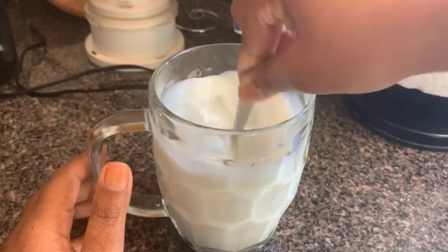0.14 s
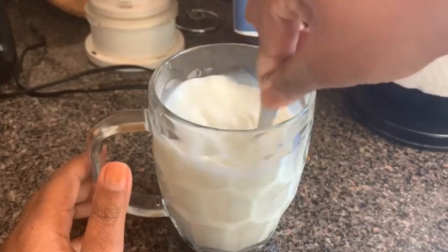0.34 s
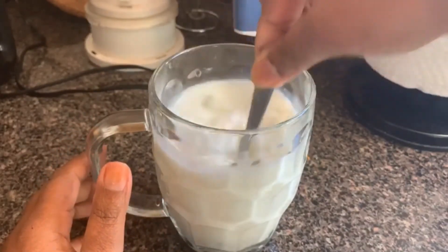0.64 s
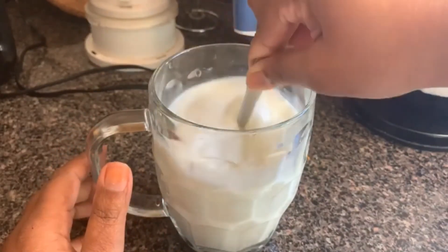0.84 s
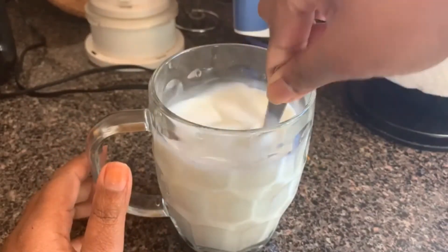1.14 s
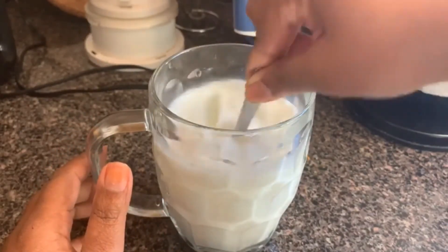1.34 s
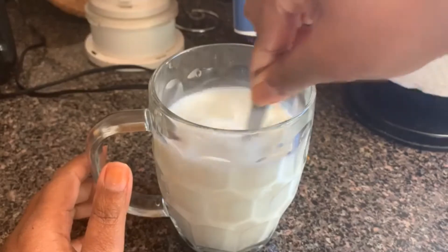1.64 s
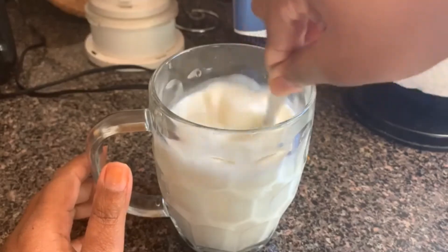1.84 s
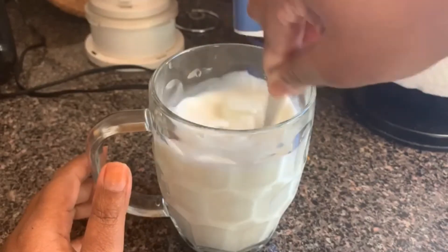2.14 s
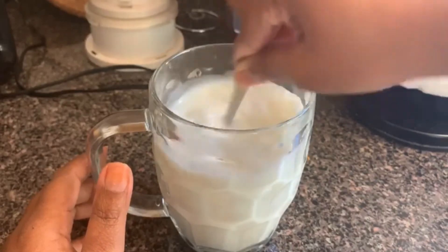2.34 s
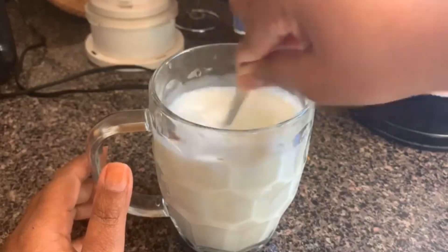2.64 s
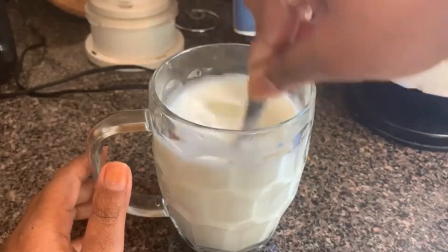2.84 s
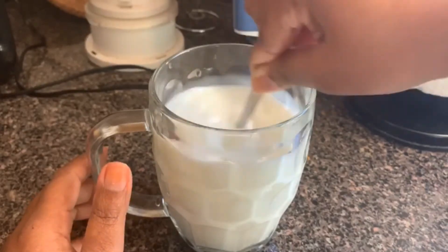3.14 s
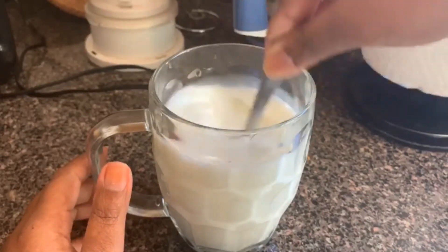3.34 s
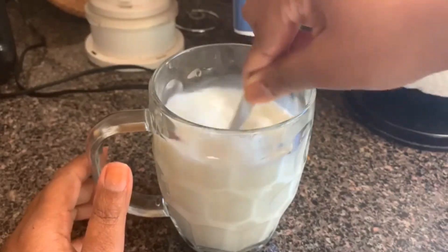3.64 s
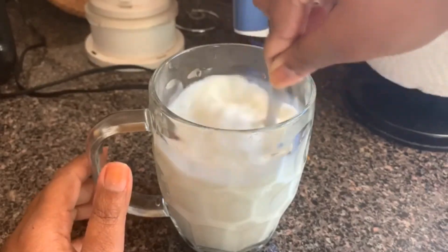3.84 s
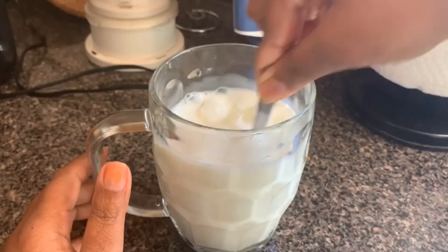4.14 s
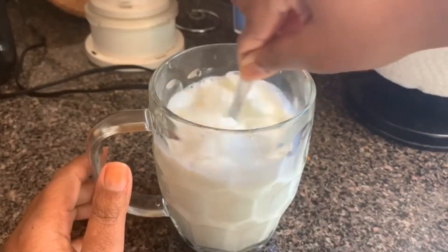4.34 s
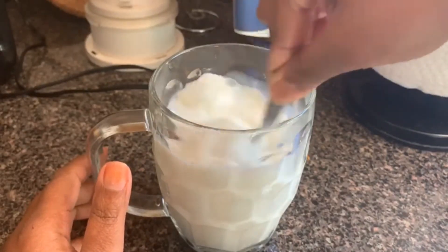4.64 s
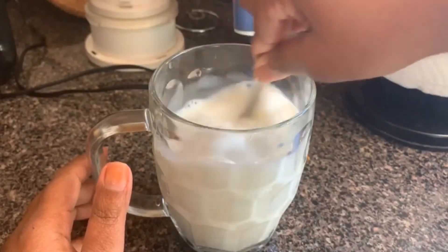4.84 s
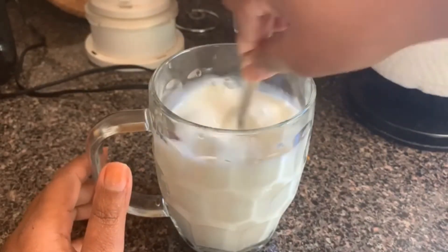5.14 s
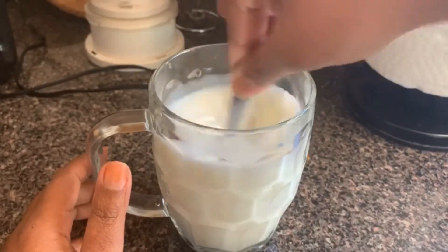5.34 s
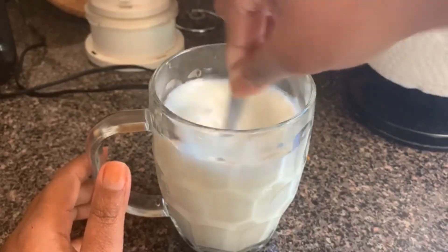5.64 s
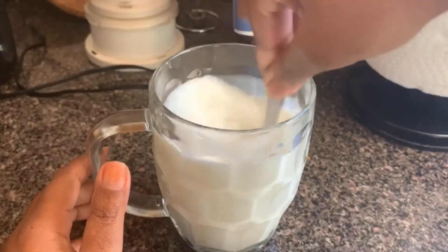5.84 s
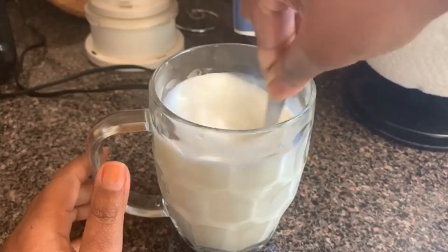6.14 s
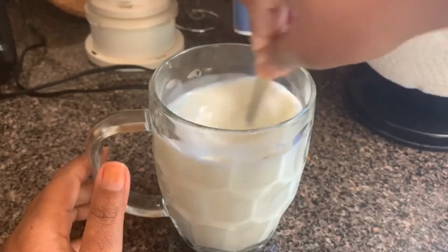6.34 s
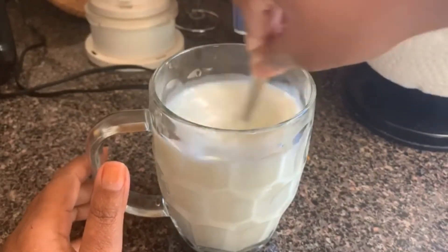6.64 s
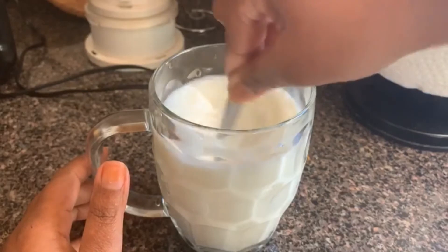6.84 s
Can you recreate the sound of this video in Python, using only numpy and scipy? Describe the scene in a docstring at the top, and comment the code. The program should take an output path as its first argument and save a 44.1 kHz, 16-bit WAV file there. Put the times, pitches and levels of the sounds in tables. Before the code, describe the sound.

Quick, uneven clinks run from start to finish as a steel spoon circles in a glass mug of milk. The liquid keeps each tap short, and sugar grates lightly along the wall under a faint gurgle. Now and then the mug knocks softly on the stone counter. The stirring is heard up close in a kitchen, over a steady refrigerator hum and low room noise.

```python
"""Stirring a glass mug

A steel spoon stirs milk and sugar in a thick glass mug on a stone counter, near a two-port microphone.
Each blow excites modes of glass and steel; the milk damps the glass, so the clinks are short.
Between clinks the spoon grinds sugar along the wall and bubbles ring in the milk.
The kitchen reverberates briefly, and a refrigerator hums behind, over faint room noise."""
import sys
import numpy as np
from scipy import signal
from scipy.fft import rfft, irfft
from scipy.io import wavfile
from scipy.ndimage import uniform_filter1d

SR = 44100
rng = np.random.default_rng(int(sys.argv[2]) if len(sys.argv) > 2 else 0)


def transcribe(signal):
    """Save signal, clipped to [-1, 1], as a 16-bit WAV file at the path in sys.argv[1]."""
    frames = np.atleast_2d(signal).T
    limited = np.clip(frames, -1, 1)
    pcm = np.round(limited * 32767).astype(np.int16)
    wavfile.write(sys.argv[1], SR, pcm)


N = 307818

# Modes of the milk-damped wall: pitch_ratio, level_db, t60_s
WALL_MODES = [(1.026, 9.5, 0.018), (1.16, -6, 0.031), (0.854, -7, 0.022)]
# Phase lead of the left port over the right: frequency_hz, lead_rad
PORT_LEAD = [(500, -0.5), (1210, 1.3), (3400, 3), (5500, 4.5), (6550, 6.5), (7840, 2.5), (9400, 2.5),
             (10300, 1.27), (12200, -0.3)]
# Level of the left port over the right: frequency_hz, balance_db
PORT_BALANCE = [(250, -1.5), (600, 0), (1150, 5), (1500, 4), (2200, .7), (4500, -1.2), (9000, 0)]


def spoon():
    """Impact excitation: the spoon strikes the wall, and some blows rock the mug on the stone."""
    # Blows on the wall: start_s, level_db, pitch_hz, relative_glass_db, relative_steel_db
    blows = [(0.039, -25.5, 1383, -12.5, -23.5), (0.143, -28.5, 1326, -25, -38),
             (0.195, -27.5, 920, -29, -27), (0.261, -36, 1640, -15, -7.5), (0.309, -30, 1580, -27, -21),
             (0.392, -33, 1250, -9, -47), (0.504, -28.5, 1570, -11, -26), (0.596, -42, 1480, -1.5, -4),
             (0.736, -24, 1450, -29, -25), (0.759, -27, 1440, -11, -16.5), (0.799, -16.5, 1490, -22, -30),
             (0.86, -25, 1323, -7.5, -36), (0.92, -30, 1380, -15, -30), (0.986, -36.5, 1390, -6.5, -12),
             (1.081, -32.5, 1540, -28, -31), (1.139, -35, 1520, -8.5, -13.5), (1.208, -40, 1550, -9, -8.5),
             (1.326, -23.5, 1330, -12, -21), (1.353, -35, 1270, -12, -2.5),
             (1.442, -24.5, 1446, -15.5, -13.5), (1.541, -25.5, 1497, -39, -48),
             (1.677, -24, 1263, -19.5, -18), (1.768, -21, 1290, -17, -25.5), (1.862, -38, 1480, 4, 3),
             (1.899, -25.5, 1430, -31, -19.5), (1.924, -39.5, 1380, -7, -8), (1.98, -26.5, 1260, -31, -36),
             (1.995, -21, 1260, -28, -35), (2.005, -35.5, 1430, -8, -7), (2.047, -24.5, 1450, -13, -14.5),
             (2.095, -18, 1265, -18, -29.5), (2.18, -17, 1550, -17, -24.5), (2.241, -43, 1270, 5.5, -11),
             (2.322, -34, 1420, -24, -22), (2.438, -22, 1306, -17, -13), (2.492, -25, 1250, -6, -25),
             (2.572, -23.5, 1580, -7, -10), (2.754, -21, 1140, -15, -26), (2.877, -33.5, 1070, -2.5, -14),
             (2.896, -26, 1320, -8, -22), (2.924, -17.5, 1297, -9, -27), (2.954, -20.5, 1280, -43, -28),
             (3.004, -41, 1580, -29, -6), (3.11, -29, 1320, -41, -27), (3.198, -25.5, 1290, -20, -36),
             (3.345, -45.5, 1290, 1, -3.5), (3.406, -33.5, 1530, 5.5, -4), (3.414, -24, 1360, -24, -17),
             (3.431, -23, 1290, -7.5, -11.5), (3.524, -27, 1103, -15, -44), (3.585, -23.5, 1174, -10, -17),
             (3.623, -16.5, 1190, -11.5, -14), (3.641, -17, 1317, -44, -22), (3.712, -25.5, 1390, -19, -24),
             (3.766, -38, 1350, -2, 0), (3.887, -18, 1225, -16, -32.5), (3.939, -22, 1067, -46, -30.5),
             (4.042, -46.5, 1620, -28, 2.5), (4.205, -24, 1306, -7, -25.5), (4.291, -29, 1660, -16, -19),
             (4.322, -23, 1544, -14, -12.5), (4.377, -42.5, 1500, -25, 1.5), (4.523, -38, 1130, -6, -11),
             (4.55, -42, 1490, -1.5, -4), (4.626, -29, 1314, -9.5, -18), (4.74, -33.5, 1110, -9, -5.5),
             (4.886, -34.5, 1350, -5.5, -10), (4.928, -31.5, 1570, -10.5, -11),
             (4.994, -17.5, 1324, -16.5, -25), (5.19, -37.5, 1450, 1, 1.5), (5.277, -17, 1383, -16, -25.5),
             (5.378, -29, 1390, -5, -21), (5.488, -27, 1240, -9.5, -12.5), (5.569, -19, 1180, -13, -25.5),
             (5.658, -25, 1250, -16, -50), (5.728, -22.5, 1246, -16, -20.5), (5.842, -20, 1470, -19, -21.5),
             (5.869, -21, 1120, -14, -23), (5.917, -29, 1570, -8, -31), (5.982, -19, 1305, -17, -21),
             (6.126, -18.5, 1140, -16, -26), (6.163, -20.5, 1285, -11, -39),
             (6.25, -26.5, 1340, -4.5, -18.5), (6.314, -19, 1260, -20.5, -25), (6.364, -34, 1600, -3, -9),
             (6.392, -24.5, 1750, -4, -34), (6.406, -21.5, 1550, -7, -42), (6.435, -12.5, 1337, -12.5, -21),
             (6.618, -15, 1280, -10.5, -28.5), (6.711, -28, 1010, -7, -20.5),
             (6.753, -24.5, 1330, -38, -25), (6.833, -24, 1080, -23, -30), (6.864, -27.5, 1080, -9, -17),
             (6.898, -25.5, 1200, -5, -12.5)]
    # Crisp blows of the spoon's thin edge: start_s, relative_level_db
    edge_blows = [(0.23, -38), (0.272, -34), (0.6958, -40), (0.921, -40), (1.8632, -47), (1.9774, -42),
                  (2.0946, -32), (2.1796, -38), (2.345, -36), (2.3926, -36.5), (2.4905, -31), (2.5752, -17),
                  (2.7516, -35), (3.0054, -27.5), (3.198, -52), (3.477, -37.5), (3.6217, -34.5),
                  (3.886, -31.5), (4.108, -36.5), (4.376, -32), (4.455, -38.5), (4.739, -37), (4.904, -40),
                  (4.9918, -36.5), (5.106, -63), (5.1903, -22.5), (5.7262, -31), (5.8423, -35),
                  (5.8711, -36), (6.123, -34.5), (6.4332, -25.5), (6.8643, -32)]
    # Spectrum of an edge blow: frequency_hz, gain_db
    edge_spectrum = [(4500, -36.5), (7100, -2), (8800, -9), (11400, -7), (13500, -43)]
    # Blows that rock the mug: start_s, level_db
    knocks = [(0.043, -43), (1.774, -31), (2.188, -42), (5.278, -41.5), (5.85, -41.5), (6.318, -40.5),
              (6.434, -35.5), (6.618, -42)]
    # Modes of the mug on the counter: frequency_hz, level_db, t60_s
    counter_modes = [(140, 19.5, 0.029), (215, 13.5, 0.028), (305, 13, 0.051), (407, 11.5, 0.058),
                     (497, 12.5, 0.043)]
    mix = np.zeros((2, N))
    for start, db, *blow in blows:
        add(mix, start, amp(db) * clink(*blow))
    for start, db in edge_blows:
        _, steel = clack(0.0013, 0.013, spectrum=edge_spectrum, width=0.27)
        add(mix, start, amp(db + 16.5) * steel)
    for start, db in knocks:
        knock = ring(counter_modes, 0.0011, spread_db=2.0, detune=0.015, spread_rad=0.064)
        add(mix, start, amp(db) * knock)
    return mix


def clink(pitch_hz, glass_db, steel_db):
    """Superposition: one blow sounds a dull wall tone, a dense clack and a few clear modes."""
    # Clear modes of the mug and of the spoon: frequency_hz, level_db, t60_s
    glass_modes = [(1988, -6.5, 0.044), (2380, -6, 0.03), (3010, 3.5, 0.042), (3804, 7.5, 0.027)]
    steel_modes = [(4820, 14, 0.012), (6960, 9, 0.015), (7800, -2, 0.0089)]
    wall = ring(np.array(WALL_MODES) * [pitch_hz, 1, 1], 0.0014,
                spread_db=3.5, detune=0.036, spread_rad=0.78)
    glass = amp(16.5) * clack(0.0022, 0.035)[0]
    steel = amp(16.0) * clack(0.00077, 0.038)[1]
    glass += ring(glass_modes, 0.002, spread_db=7.5, detune=0.0583)
    steel += ring(steel_modes, 0.00071, spread_db=5.0, detune=0.024, spread_rad=0.58)
    return wall + amp(glass_db) * glass + amp(steel_db) * steel


def ring(modes, rise_s, spread_db=4, detune=0.0215, spread_rad=0.79):
    """Damped free vibration: where a blow lands changes each mode's share, tuning and phase."""
    hz, db, t60_s = np.transpose(modes)[:, :, None]
    share, tuning, side = rng.standard_normal((3, len(hz), 1))
    t = np.arange(SR // 8) / SR
    gain = amp(db + spread_db * share)
    gain *= np.linalg.norm(amp(db)) / np.linalg.norm(gain)  # the blow's energy is only redistributed
    envelope = gain * amp(-60 * t / t60_s) * (1 - np.exp(-t / rise_s)) ** 2
    phase = 2 * np.pi * hz * (1 + detune * tuning) * t
    return at_ports(hz, phase, envelope, spread_rad * side)


def clack(rise_s, t60_s, spectrum=None, width=0.75, ripple_db=3.5, split_hz=3980):
    """Modal overlap: crowded modes merge into dying noise. Returns glass (lows) and steel (highs)."""
    # Short modes of mug, milk and spoon together: frequency_hz, gain_db
    dense_spectrum = [(1500, -50), (2000, -5.5), (3000, -2), (4400, 4.5), (5600, -6), (7100, -2),
                      (8800, -9), (10000, -6.5), (11600, -8), (12300, -41.5)]
    t, hz = np.arange(SR // 8) / SR, np.fft.rfftfreq(SR // 8, 1 / SR)
    noise = rng.standard_normal((3, len(t))) * amp(-60 * t / t60_s) * (1 - np.exp(-t / rise_s)) ** 2
    burst = (noise[0] + width * noise[1:]) / abs(noise[0]).max()
    # each spot on the wall favours other groups of modes
    ripple = unit_rms(uniform_filter1d(uniform_filter1d(rng.standard_normal(len(hz)), 30), 30))
    sides = np.array([[.5], [-.5]])
    gain_db = curve(spectrum or dense_spectrum, hz) + ripple_db * ripple + sides * curve(PORT_BALANCE, hz)
    shaped = rfft(burst) * amp(gain_db) * np.exp(1j * sides * curve(PORT_LEAD, hz))
    highpass = 1 / (1 + (split_hz / (hz + 1)) ** 8)
    return irfft(shaped * (1 - highpass), len(t)), irfft(shaped * highpass, len(t))


def stirring():
    """Granular friction: sugar ticks on the wall and grates between steel and glass as the milk gurgles."""
    # Scrapes along the wall: start_s, length_s, tick_db, grit_db, gurgle_db
    scrapes = [(0.0, 0.011, -37, -46.5, -68), (0.125, 0.067, -57, -53, -45), (0.239, 0.02, -57, -56, -47),
               (0.497, 0.064, -52, -51, -51), (0.705, 0.2, -45, -46, -48.5),
               (1.324, 0.049, -49.5, -45.5, -50), (1.445, 0.15, -54, -55.5, -52),
               (1.893, 0.33, -46, -77, -66), (2.303, 0.28, -50.5, -59.5, -68),
               (2.858, 0.15, -47, -57.5, -58), (3.319, 0.13, -53.5, -57, -55),
               (3.403, 0.071, -35, -46.5, -53), (3.61, 0.17, -46.5, -73, -68),
               (3.886, 0.037, -47, -53, -67), (4.281, 0.046, -52, -41, -45), (4.354, 0.1, -85, -52, -65),
               (4.773, 0.081, -47, -45, -46), (5.049, 0.14, -54, -61, -52), (5.823, 0.11, -53, -61, -54),
               (6.06, 0.27, -56, -53.5, -54.5), (6.346, 0.067, -39.5, -47, -42),
               (6.69, 0.22, -47, -67, -49)]
    # grains and milk keep circling between scrapes; rows are tick, grit, gurgle
    swirl_db, wander_db = [[-52], [-62], [-60]], [[1.5], [6.], [5.]]
    drive = amp(swirl_db) * amp(wander_db * drift(30.0))
    for start, length, *db in scrapes:
        drive += amp(db)[:, None] * stroke(start, length)
    ticks = [ring(np.array(WALL_MODES) * [hz, 1, 1], 0.0022, detune=0.067)
             for hz in np.geomspace(1060, 1660, num=24)]
    clacks = [clack(0.00065, 0.013) for _ in range(30)]
    grains = [part for glass, steel in clacks for part in (amp(0.5) * glass, steel)]
    bubbles = [bubble(hz) for hz in np.geomspace(1700, 4700, num=40)]
    ticking = scatter(ticks, per_s=1500, spread_db=8.5)
    grit = moving_milk(scatter(grains, per_s=2200, spread_db=7.0), depth_db=4.5)
    gurgle = moving_milk(scatter(bubbles, per_s=1100, spread_db=5.5), depth_db=7.5)
    return drive[0] * ticking + drive[1] * grit + drive[2] * gurgle


def stroke(start_s, length_s, rise_s=0.0018, fall_s=0.021):
    """Envelope of one scrape: linear rise, hold and exponential decay."""
    t = np.arange(N) / SR - start_s
    return np.clip(t / rise_s, 0, 1) * np.exp(-np.maximum(t - length_s, 0) / fall_s)


def bubble(hz):
    """Bubble resonance: an air pocket in the milk swells and dies away, usually rising in pitch."""
    t = np.arange(SR // 20) / SR
    envelope = amp(-60 * t * hz / 55) * (1 - np.exp(-t * hz / 6)) ** 2
    phase = 2 * np.pi * hz * (t + rng.uniform(-0.86, 4.4) * t ** 2)
    return at_ports(hz, phase[None], envelope[None], 0.84 * rng.standard_normal())


def moving_milk(sound, depth_db):
    """Time-varying filtering: the milk opens and closes resonances a few hundred Hz wide for some 40 ms."""
    spectra = signal.stft(sound, nperseg=512, noverlap=384)[2]
    patches = uniform_filter1d(rng.standard_normal(spectra.shape[1:]), size=4, axis=0)
    patches = unit_rms(uniform_filter1d(patches, size=14, axis=1))
    spectra = spectra * amp(depth_db * patches)
    return unit_rms(signal.istft(spectra, nperseg=512, noverlap=384)[1][:, :N])


def kitchen(sound):
    """Reverberation: sparse reflections of random sign, each band decaying at its own rate."""
    # Reverberation times: frequency_hz, t60_s
    decay_times = [(300, 0.16), (1500, 0.18), (5000, 0.17), (12000, 0.067)]
    reflections = np.zeros((2, SR // 2))
    slots = np.arange(200, SR // 2 - 20, 20)
    delays = slots + rng.integers(0, 20, (2, len(slots)))
    np.put_along_axis(reflections, delays, rng.choice([-1., 1.], delays.shape), 1)
    hz, t, spectra = signal.stft(reflections, SR, nperseg=256)
    decay = amp(-60 * t / curve(decay_times, hz)[:, None])
    tail = signal.istft(spectra * decay, SR, nperseg=256)[1]
    return signal.fftconvolve(sound, tail / np.linalg.norm(tail[0]), axes=1)[:, :N]


def fridge(swell_period_s=3.1, swell_peak_s=2.92):
    """Forced vibration: compressor tones swell slowly and reach the right port first and louder."""
    # Compressor tones: frequency_hz, level_db, left_lead_rad, swell_db
    tones = [(59.33, -39, -0.15, 2.5), (118.12, -31, -0.29, 0.03), (258.8, -43, -0.27, 0.9)]
    t, sides = np.arange(N) / SR, np.array([[.5], [-.5]])
    swell = np.cos(2 * np.pi * (t - swell_peak_s) / swell_period_s)
    hum = np.zeros((2, N))
    for hz, db, lead, swell_db in tones:
        phase = 2 * np.pi * (hz * t + rng.random()) + 0.23 * drift(1.8) + sides * lead
        hum += np.sqrt(2) * amp(db + swell_db * swell) * np.sin(phase)
    return hum * amp(-sides)


def room_noise(level_db=-39.5):
    """Partial coherence: a flickering noise floor whose lows are nearly alike at both ports."""
    # Noise spectrum: frequency_hz, relative_density_db
    spectrum = [(15, -42), (58, -3), (122, -6.5), (176, -16), (259, -10), (628, -25.5), (1560, -38),
                (2130, -63), (6860, -53.5), (11200, -101), (12500, -115)]
    # Likeness of the two ports: frequency_hz, correlation
    port_correlation = [(60, .92), (250, .88), (450, .7), (800, .2), (2800, -.5), (12000, -.4)]
    frames, hz = N // 512 + 5, np.fft.rfftfreq(2048, 1 / SR)
    left_re, left_im, other_re, other_im, patches = rng.standard_normal((frames, 1025, 5)).T
    patches = unit_rms(uniform_filter1d(uniform_filter1d(patches, 20, axis=0), 6, axis=1))
    correlation = np.clip(curve(port_correlation, hz), -1, 1)[:, None]
    left = left_re + 1j * left_im
    right = correlation * left + np.sqrt(1 - correlation ** 2) * (other_re + 1j * other_im)
    spectra = np.array([left, right]) * amp(curve(spectrum, hz)[:, None] + 1.5 * patches)
    return amp(level_db) * unit_rms(signal.istft(spectra, nperseg=2048, noverlap=1536)[1][:, :N])


def at_ports(hz, phase, envelope, extra_lead_rad):
    """Phase and level cues: each tone reaches the two ports with its own lead and balance."""
    lead = curve(PORT_LEAD, hz) + extra_lead_rad
    balance = amp(curve(PORT_BALANCE, hz) / 2)
    left = envelope * balance * np.sin(phase + lead / 2)
    right = envelope / balance * np.sin(phase - lead / 2)
    return np.array([left.sum(0), right.sum(0)])


def scatter(grains, per_s, spread_db):
    """Shot noise: grains sound at random moments, a few of them loudly."""
    sizes = amp(spread_db * np.minimum(rng.exponential(1, N), 4))
    impulses = sizes * (rng.random(N) < per_s / SR)
    which = rng.integers(0, len(grains), N)
    return unit_rms(sum(signal.oaconvolve((impulses * (which == k))[None], grain, axes=1)[:, :N]
                        for k, grain in enumerate(grains)))


def drift(top_hz):
    """Random modulation: slow sines of random phase, summed to unit rms."""
    t = np.arange(0, N + 256, 256) / SR
    slow = sum(np.sin(2 * np.pi * (hz * t + rng.random())) / np.sqrt(hz)
               for hz in np.geomspace(.3, top_hz, num=24))
    return np.interp(np.arange(N) / SR, t, unit_rms(slow))


def amp(db):
    return 10 ** (np.asarray(db) / 20)


def unit_rms(x):
    return x / np.sqrt(np.mean(x ** 2) + 1e-20)


def curve(points, hz):
    """Interpolation on a logarithmic frequency axis."""
    point_hz, values = np.transpose(points)
    return np.interp(np.log(hz + 1), np.log(point_hz + 1), values)


def add(mix, start_s, sound):
    part = mix[:, round(start_s * SR):][:, :sound.shape[1]]
    part += sound[:, :part.shape[1]]


def scene():
    """Superposition of the mug's direct sound, its reverberation and the background."""
    mug = spoon() + stirring()
    return mug + amp(-9) * kitchen(mug) + fridge() + room_noise()


def record(dry):
    """Band limiting: a linear-phase low-pass removes the highest treble."""
    cutoff_hz = 13500
    lowpass = signal.firwin(201, cutoff_hz, window=("kaiser", 8), fs=SR)
    return signal.oaconvolve(dry, lowpass[None], "same")


dry = scene()
out = record(dry)
transcribe(out)
```